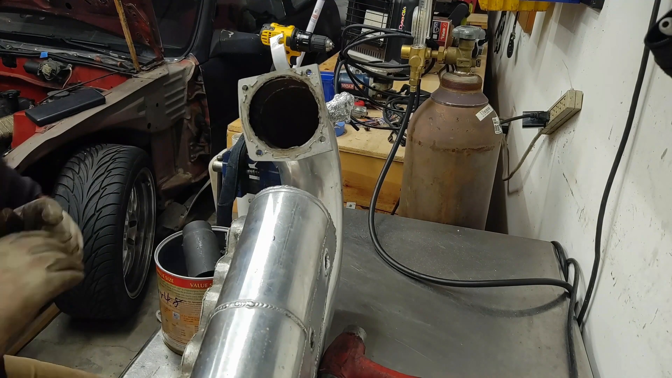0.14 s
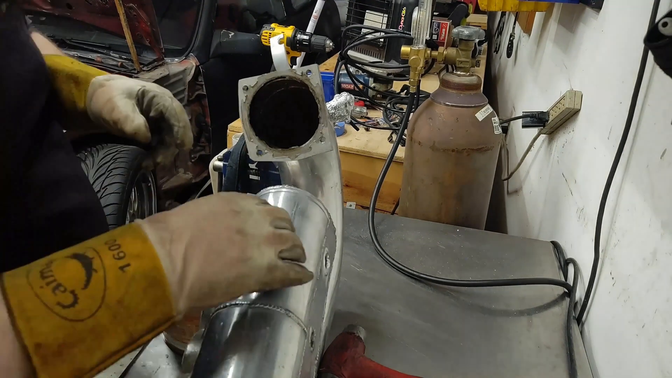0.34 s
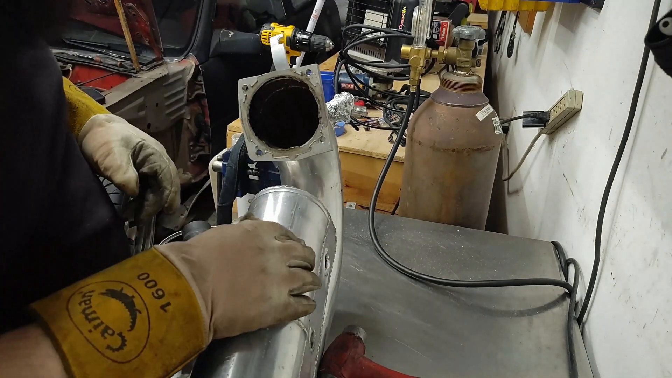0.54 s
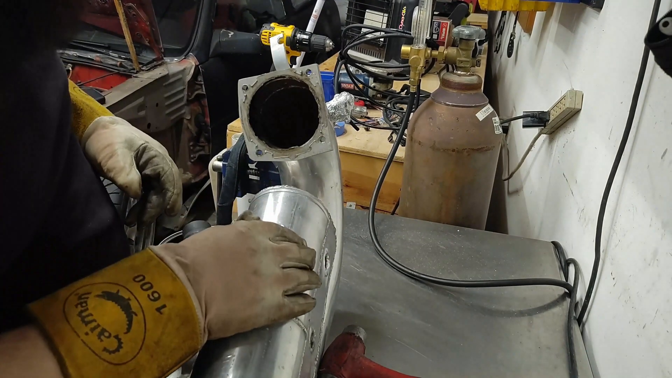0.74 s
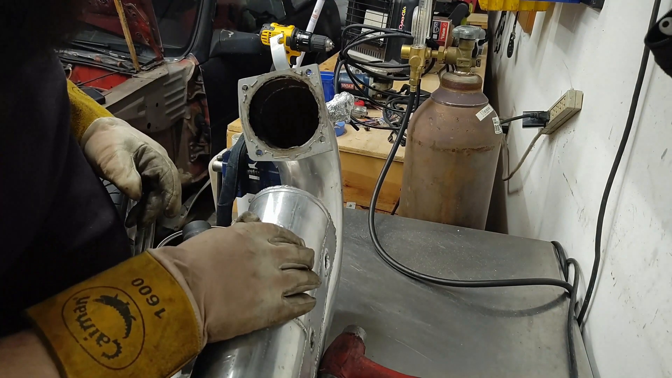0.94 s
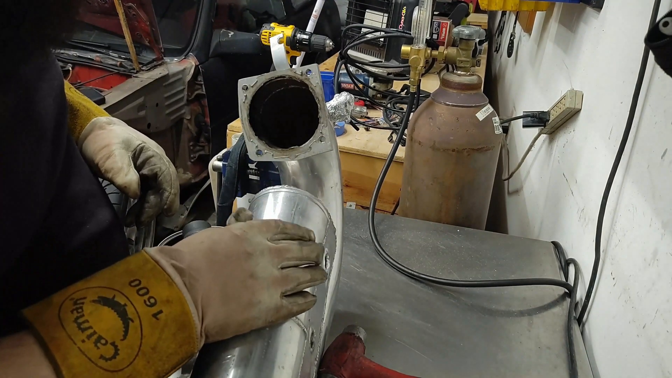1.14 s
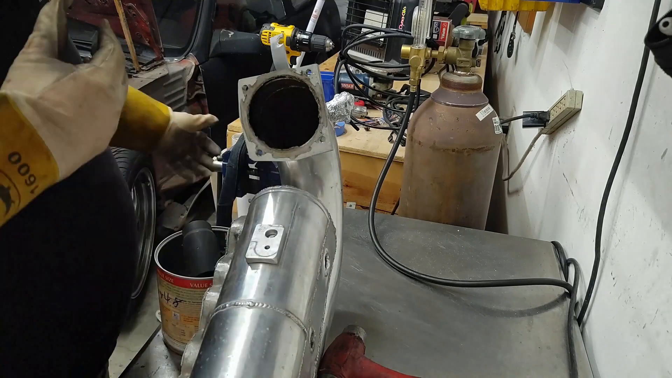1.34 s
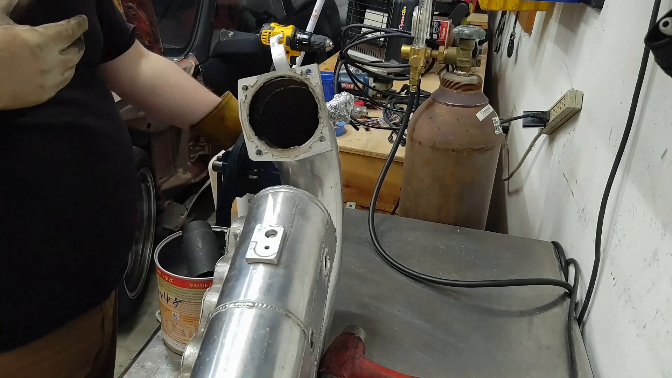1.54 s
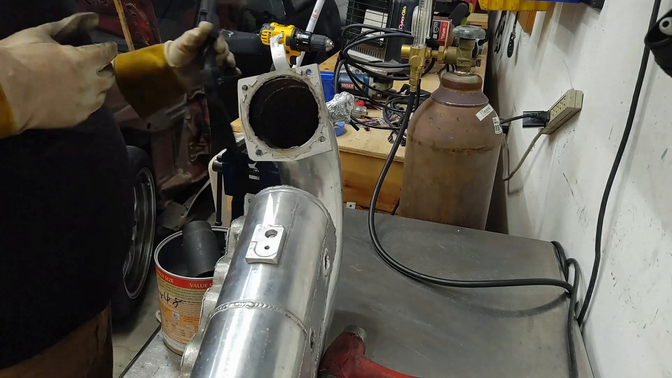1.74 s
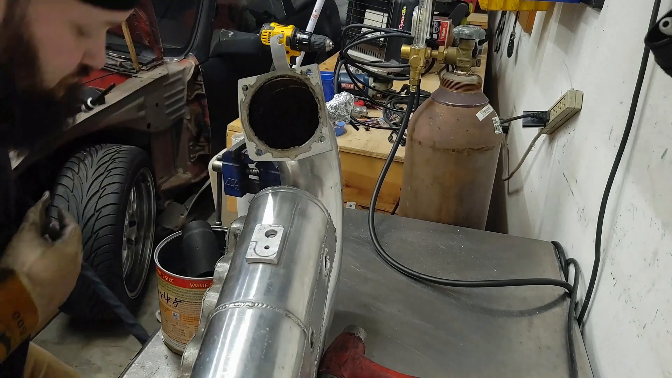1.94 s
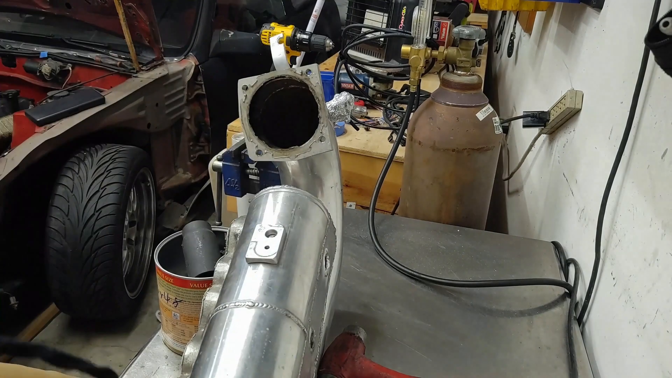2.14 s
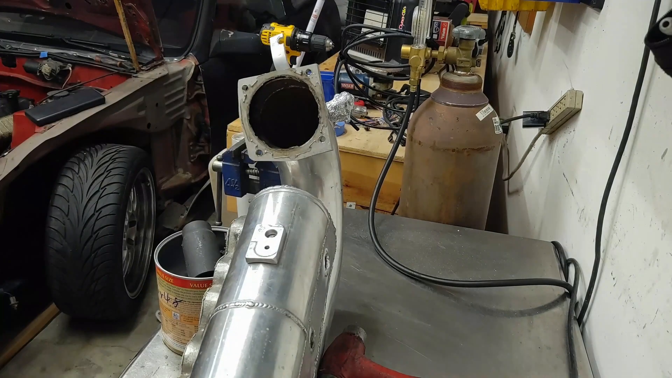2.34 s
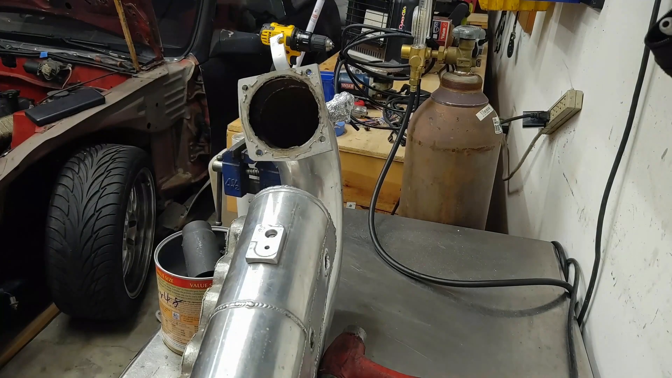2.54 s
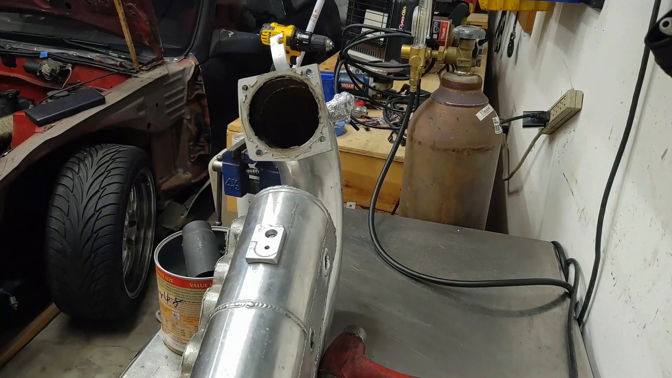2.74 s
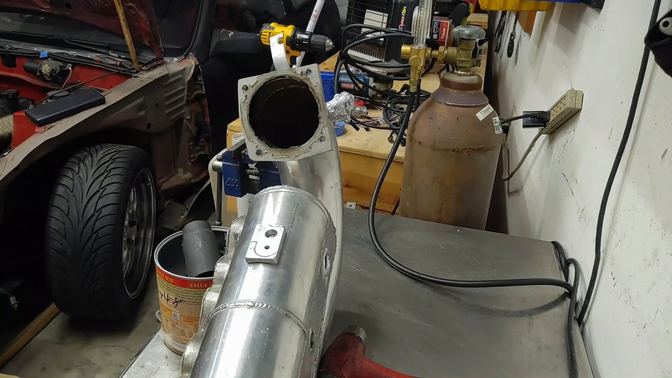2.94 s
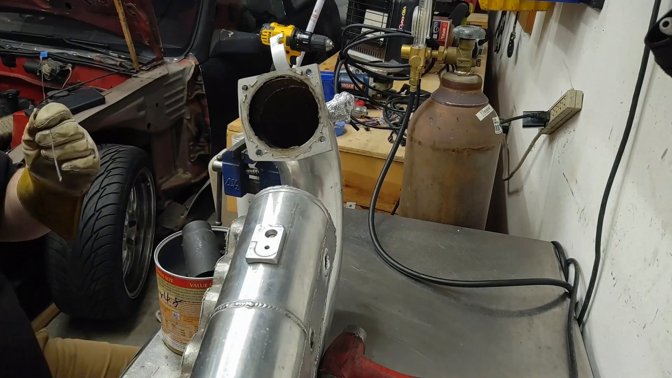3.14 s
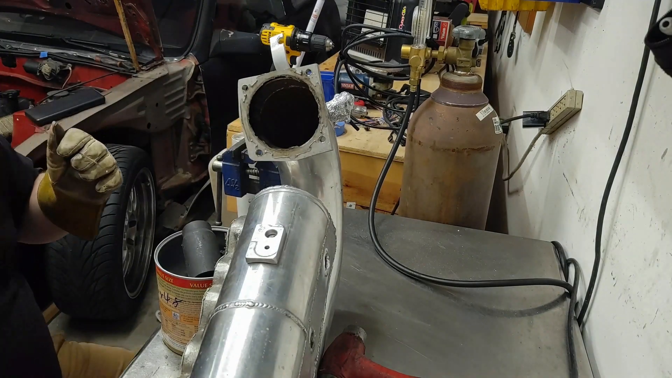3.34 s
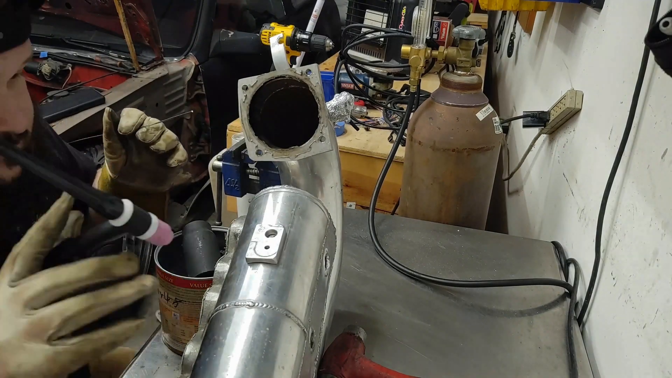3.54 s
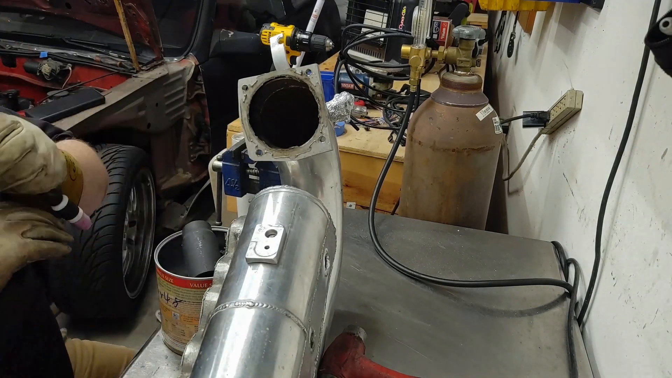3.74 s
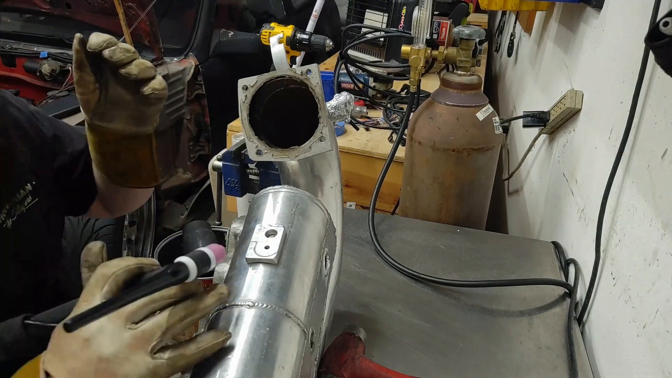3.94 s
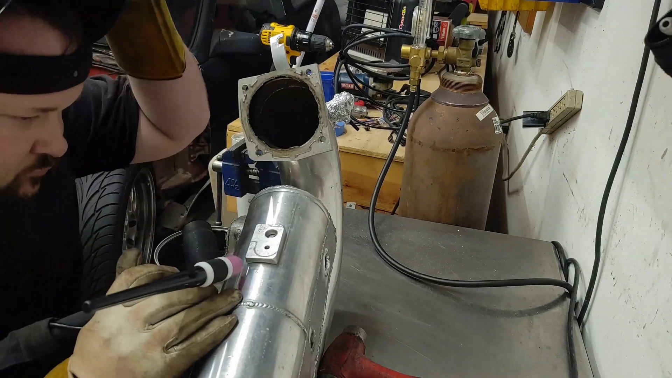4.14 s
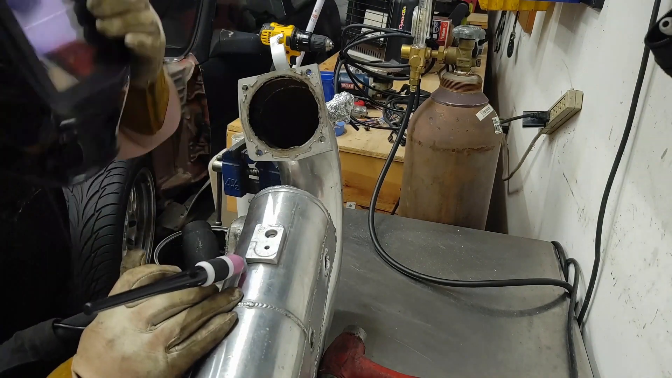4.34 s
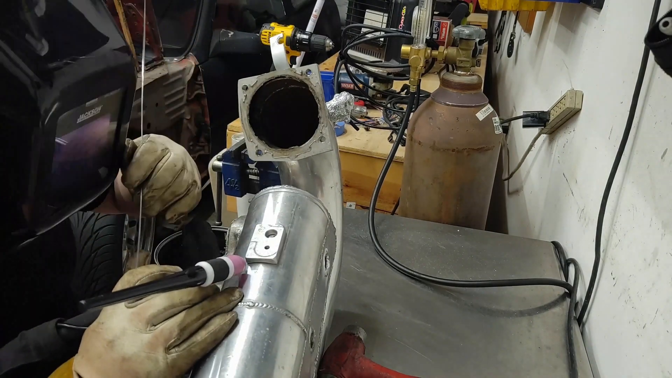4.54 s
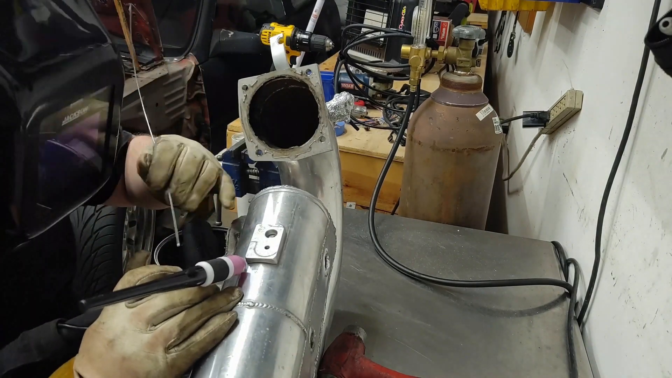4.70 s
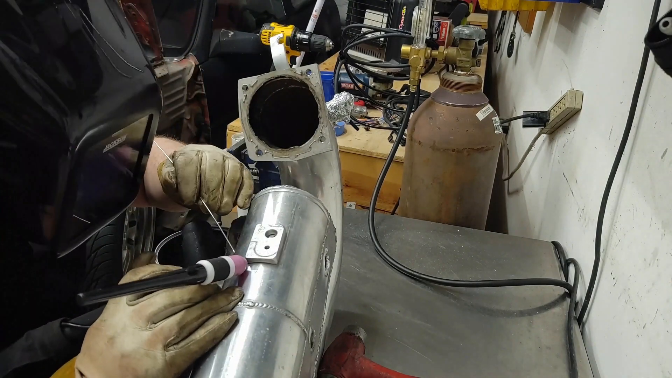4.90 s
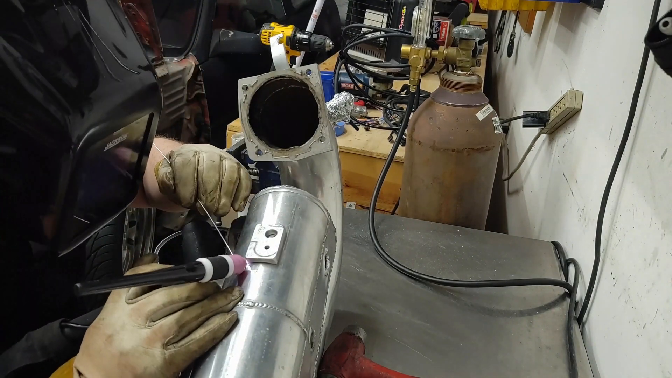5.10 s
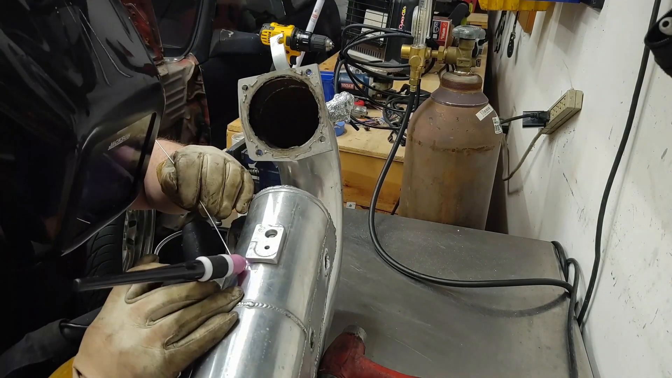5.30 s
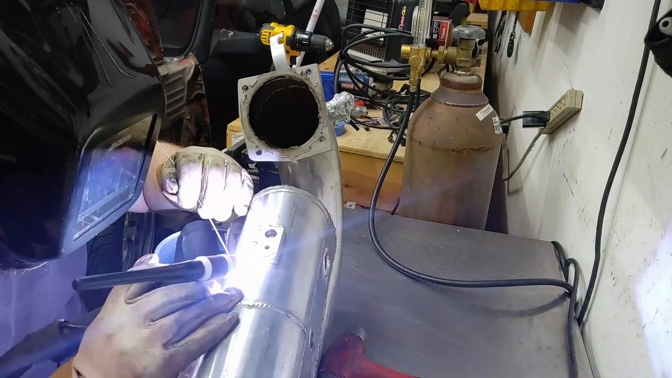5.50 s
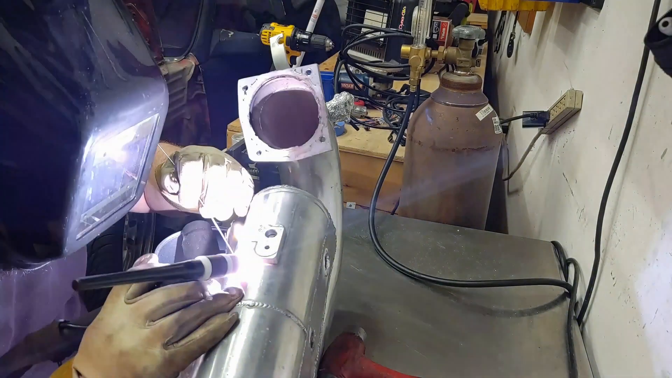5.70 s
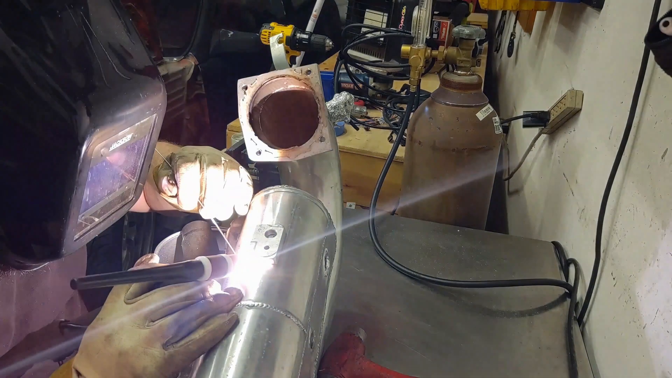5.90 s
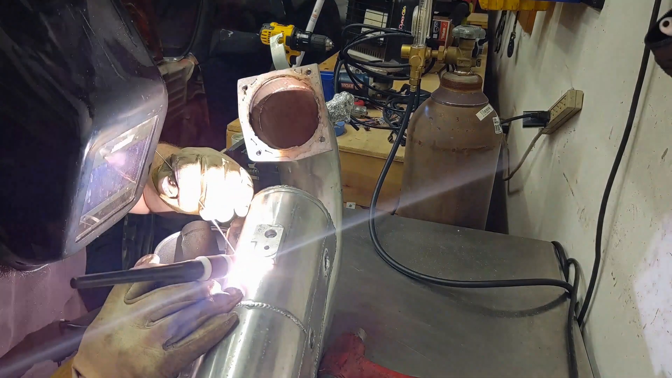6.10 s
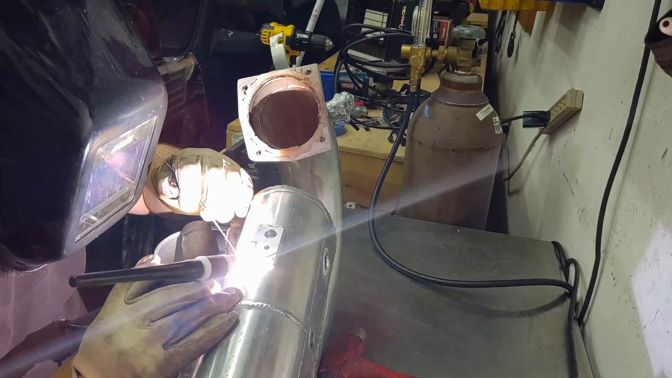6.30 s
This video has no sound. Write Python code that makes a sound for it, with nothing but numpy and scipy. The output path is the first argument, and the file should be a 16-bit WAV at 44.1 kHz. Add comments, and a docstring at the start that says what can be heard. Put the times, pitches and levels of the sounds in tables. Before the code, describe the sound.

A subdued low garage murmur runs underneath, with a barely perceptible very high equipment whine. A faint glove rub comes at 0.15 seconds, a small tick near 0.5, and a sharp, bright click at 0.6. Another light click with a soft thump lands at 1.6, a very faint one at 1.8. A soft rub at 2.1 leads to scuffs and a cluster of glassy rod clinks and clicks from 2.4 to 2.75. At 3.1 a duller double knock comes with a short, stronger scrape; faint rubs follow until 3.9, then quiet. At 5.0 a loud, dense spark hiss starts abruptly, thin then fuller. The arc catches at 5.6, drops out almost completely until 5.67, and returns with soft gas pops. From 5.75 the hiss gives way to a steady, raspy buzz pitched around 147 hertz, with throbbing fizz, slight wavering and occasional spits, continuing to the end at about 6.4. Close, dry stereo.

```python
"""A welder picks up a TIG torch and filler rod in a garage, then lights an arc on an aluminium pipe.
Rubs and scuffs, damped noise-struck clicks and ringing rod modes sound over a murmur of coloured noise.
At 5 s starting sparks hiss as coloured noise for half a second; the AC arc catches and falters with them.
It then settles into a buzz of wavering harmonics, with throbbing noise for fizz, noise spits and
a few soft pops of gas made of short low cycles."""
import sys
import numpy as np
from scipy import signal
from scipy.io import wavfile
from scipy.ndimage import uniform_filter1d

SR = 44100
rng = np.random.default_rng(int(sys.argv[2]) if len(sys.argv) > 2 else 0)


def put_to_file(sound):
    """Save the sound as 16-bit audio at rate SR, in the file named by the first command-line argument."""
    columns = np.atleast_2d(sound).T  # one column per channel
    safe = np.clip(columns, -1, 1)
    whole_steps = np.round(safe * 32767)
    wavfile.write(sys.argv[1], SR, whole_steps.astype(np.int16))


N = 280476
TIME = np.arange(N) / SR

ARC_HZ, EDGE_HZ = 147.39, 15850  # AC frequency; upper edge of the sound
SPARK_ON_S = 5.0015  # press of the pedal
CATCH_S, CATCH_RISE_S = 5.586, 0.0042  # the arc catches and burns weakly
SETTLE_S, SETTLE_RISE_S = 5.742, 0.0031  # the arc settles at full current


def gain_of(db):
    """Decibels to amplitude."""
    return 10 ** (np.asarray(db) / 20)


def evened(x):
    """Scales to an rms of one."""
    return x / np.sqrt(np.mean(x ** 2) + 1e-20)


def stereo_gain(table, hz):
    """Left and right gain of a colour, interpolated over log frequency."""
    table_hz, *sides_db = np.transpose(table)
    return gain_of([np.interp(np.log(hz + 1), np.log(table_hz), side_db) for side_db in sides_db])


def level(table):
    """Gain over time of a level curve, practically silent before its first point."""
    s, db = np.transpose(table)[:2]
    return gain_of(np.interp(TIME, s, db, left=-120))


def add(mix, s, sound):
    """Mixes a sound in at a time."""
    part = mix[..., round(s * SR):][..., :sound.shape[-1]]
    part += sound[..., :part.shape[-1]]


def wander(rate_hz):
    """A smooth random curve of about unit rms."""
    knots = np.convolve(rng.standard_normal(4096), np.hanning(7), "same")
    return np.interp(TIME * rate_hz * 6, np.arange(len(knots)), evened(knots))


def coloured(x, gain_at, size=4096):
    """Passes a sound through a causal minimum-phase filter whose gain is a function of frequency."""
    log_gain = np.log(gain_at(abs(np.fft.fftfreq(size, 1 / SR))) + 1e-6)
    taps = np.fft.ifft(np.exp(np.conj(signal.hilbert(log_gain)))).real
    taps = np.atleast_2d(taps)[:, :size // 2]
    return signal.oaconvolve(np.atleast_2d(x), taps, axes=1)[:, :x.shape[-1]]


def noise(table, likeness, lag_samples):
    """Coloured noise at two ports; the shared part reaches the left one later by the lag."""
    shared, *own = rng.standard_normal((3, N))
    shared_pair = np.array([np.roll(shared, lag_samples), shared])
    pair = np.sqrt(likeness) * shared_pair + np.sqrt(1 - likeness) * np.array(own)
    return coloured(pair, lambda hz: stereo_gain(table, hz))


def bump(hz, centre_hz, q):
    """Gain of one resonance, one at its centre."""
    return 1 / np.hypot(1, q * ((hz + 1) / centre_hz - centre_hz / (hz + 1)))


def burst(contact_s, size=4096):
    """A rattle of contact: noise that builds and dies quickly."""
    u = np.arange(size) / SR / contact_s
    return 2 * rng.standard_normal(size) * u * np.exp(-u ** 2)


def held(start_s, end_s, rise_s, fade_s):
    """An envelope that rises to one by its start, holds, and fades after its end."""
    return np.exp(np.minimum(TIME - start_s, 0) / rise_s - np.maximum(TIME - end_s, 0) / fade_s)


def switched(start_s, rise_s):
    """An envelope that rises to one and stays there."""
    return np.exp(np.minimum(TIME - start_s, 0) / rise_s)


def falter_db():
    """How far the discharge has sunk while the arc nearly goes out."""
    # overlapping drops shared by sparks and arc: (start [s], end [s], further drop [dB])
    falters = [(5.612, 5.671, -7), (5.644, 5.671, -14)]
    edge_s = 0.0019
    return sum(db * held(start_s, end_s, edge_s, edge_s) for start_s, end_s, db in falters)


def arc_strength():
    """The arc catches weakly, falters, then settles and wanders a little with the torch."""
    young_db, settled_db, wander_db = -2.5, -0.5, 0.72
    db = young_db + (settled_db - young_db) * switched(SETTLE_S, SETTLE_RISE_S) + wander_db * wander(11)
    return switched(CATCH_S, CATCH_RISE_S) * gain_of(db + falter_db())


def arc_harmonics(orders, weak_strike=0.83, direct=4):
    """The arc restrikes twice a cycle and reaches the ports directly and by many short paths."""
    # harmonics that pipe and nearby surfaces single out: (multiple, left [dB], right [dB])
    strong = [(1, -63, -54), (5, -47, -52), (7, -39, -52), (8, -51, -49), (9, -58, -38), (10, -48, -53),
              (11, -39, -49), (13, -46, -56), (15, -48, -45), (17, -42, -44), (18, -47, -51),
              (19, -42, -49), (20, -43, -55), (21, -37, -57), (22, -38, -42), (23, -40, -48),
              (24, -33, -39), (25, -42, -52), (26, -37, -54), (30, -47, -46), (32, -45, -49),
              (33, -37, -47), (34, -38, -52), (36, -44, -61), (37, -32.5, -44), (39, -43, -40),
              (43, -44, -44), (45, -35, -56), (58, -54, -40), (74, -61, -38)]
    # the others, before path interference: (frequency [Hz], left [dB], right [dB])
    weak = [(300, -58, -49), (440, -59, -47), (600, -50, -53), (900, -52, -53), (2000, -52, -54),
            (3000, -53, -56), (4200, -51, -57), (5200, -52, -51), (6200, -49, -55), (7200, -48, -51),
            (8500, -52, -47), (10000, -58, -45), (12000, -60, -46), (14000, -57, -49), (15700, -56, -51)]
    direct_edge_hz = 3030  # above this the direct path weakens, so the treble pulses are less spiky
    port_skew = 0.58  # share of the port phase difference that strong harmonics keep
    hz = orders * ARC_HZ
    strikes = 1 + weak_strike * np.exp(-2j * np.pi * orders * .53)  # second strike 0.53 cycle later
    delays_s, signs = rng.gamma(2, .0007, (2, 40, 1)), rng.choice([-1, 1], (2, 40, 1))
    echoes = (signs * np.exp(-2j * np.pi * hz * delays_s)).sum(1)
    paths = direct / (1 + (hz / direct_edge_hz) ** 4) + echoes + .6 * echoes.mean(0)
    # interference between the paths leaves the weak harmonics uneven
    gains = stereo_gain(weak, hz) * evened(abs(paths) ** .5)
    phases = np.angle(strikes * paths)
    for multiple, *sides_db in strong:
        k = np.argmin(abs(orders - multiple))
        gains[:, k] = gain_of(sides_db)
        phases[1, k] = phases[0, k] + port_skew * np.angle(paths[1, k] / paths[0, k])
    return gains * np.exp(1j * phases)


def buzz(strength, drift_rad=0.082):
    """AC arc as a harmonic series; moving torch and restless gas make each harmonic waver and flutter."""
    waver_db, jitter_s = 1.3, 1.2e-6  # rms of each harmonic's level and of the strike timing
    flutter = 0.22  # quick unrest as a share of each harmonic
    surge_db, surge_fade_s = 1.5, 0.079  # the low harmonics surge as the arc settles
    low_hold = 0.27  # share of the falter that the low harmonics are spared
    orders = np.arange(1, int(EDGE_HZ / ARC_HZ) + 1)
    lit = TIME > CATCH_S - 10 * CATCH_RISE_S
    t = (TIME + jitter_s * wander(90))[lit]
    surge = held(SETTLE_S, SETTLE_S, SETTLE_RISE_S, surge_fade_s)
    low_db = (surge_db * surge - low_hold * falter_db())[lit]

    slow = rng.standard_normal((len(orders), 2, 100))
    slow = evened(uniform_filter1d(uniform_filter1d(slow, size=12), size=12))
    quick = evened(uniform_filter1d(rng.standard_normal(slow.shape), size=2))
    drift = drift_rad * np.sqrt(orders * ARC_HZ / 1000)[:, None]  # phase drift, full size at 1 kHz
    unrest = gain_of(waver_db * slow[:, 0]) * np.exp(1j * drift * slow[:, 1])
    unrest = unrest + flutter * (quick[:, 0] + 1j * quick[:, 1])

    grid, out = np.linspace(t[0], t[-1], slow.shape[-1]), np.zeros((2, N))
    for hz, line, waver in zip(orders * ARC_HZ, arc_harmonics(orders).T, unrest):
        low_gain = gain_of(low_db / (1 + (hz / 2100) ** 4))
        tone = low_gain * np.interp(t, grid, waver) * np.exp(2j * np.pi * hz * t)
        out[:, -len(t):] += np.sqrt(2) * (line[:, None] * tone).real
    return out * strength


def hum():
    """A sine at the lowest harmonic of the arc swells and fades, mostly at the right port."""
    # swell before the port offsets: (time [s], level [dB])
    swell = [(5.8, -52), (5.814, -44), (5.9, -53), (5.922, -44), (5.998, -45.5), (6.03, -62), (6.12, -39.5),
             (6.212, -59), (6.35, -52)]
    # port offsets: (left [dB], right [dB])
    ports_db = [-13, 4.5]
    tone = np.sqrt(2) * np.sin(2 * np.pi * ARC_HZ * TIME)
    return gain_of(ports_db)[:, None] * tone * level(swell)


def fizz(strength, depth=0.37):
    """Hot gas fizzes as noise throbbing at twice the AC rate; the weld pool spits in noise bursts."""
    # fizz colour before its level: (frequency [Hz], left [dB], right [dB])
    colour = [(30, -58, -49), (90, -45, -36), (250, -35, -31), (700, -33, -35), (1400, -33, -35),
              (2100, -34, -36), (3400, -28.5, -34), (4300, -32, -36), (5500, -28, -33), (7500, -33, -34),
              (9000, -36, -30), (11000, -40, -29), (13500, -37, -29.5), (15500, -31.5, -28.5)]
    # spits: (time [s], level [dB])
    spits = [(5.587, -28), (5.601, -28), (5.701, -26), (5.759, -29), (6.095, -32), (6.3, -33)]
    fizz_db, flicker_db = 0.4, 1.1
    throb = evened(1 + depth * np.cos(4 * np.pi * ARC_HZ * TIME))
    flicker = gain_of(fizz_db + flicker_db * wander(25))
    out = noise(colour, likeness=0.48, lag_samples=-2) * throb * strength * flicker
    for s, db in spits:
        add(out, s, gain_of(db) * np.array([burst(0.00099), burst(0.00087)]))
    return out


def pops():
    """Soft pushes of shielding gas, a cycle or two long; the deep ones buffet the right port."""
    # (time [s], right level [dB], pitch [Hz], left relative to right [dB])
    pushes = [(5.587, -36, 110, -24), (5.601, -27, 151, -23), (5.681, -27.5, 670, 5.5),
              (5.688, -27, 1080, 10), (5.7, -30.5, 656, 8), (5.822, -33, 128, -14),
              (6.246, -35.5, 165, -20), (6.303, -30.5, 110, -24)]
    out = np.zeros((2, N))
    for s, db, hz, left_db in pushes:
        cycles = (TIME - s) * hz
        push = np.cos(2 * np.pi * cycles) * np.exp(-(cycles / 0.71) ** 2)
        out -= gain_of([[db + left_db], [db]]) * push
    return out


def spark_strength():
    """The sparks switch on, sag slowly, yield once the arc carries current, and stop."""
    off_s, rise_s, fade_s = 5.762, 0.0016, 0.0089
    start_db, sag_db_per_s, yield_db = 0.17, -2, -3.5
    db = start_db + sag_db_per_s * (TIME - SPARK_ON_S) + yield_db * switched(CATCH_S, CATCH_RISE_S)
    return held(SPARK_ON_S, off_s, rise_s, fade_s) * gain_of(db + falter_db())


def sparks():
    """Starting sparks come so densely that they merge into a hiss, modelled as resonant noise."""
    # hiss colour before cup and strength: (frequency [Hz], left [dB], right [dB])
    colour = [(30, -53, -45), (132, -32, -26), (450, -34, -26.5), (900, -30, -26.5), (1380, -32, -22),
              (2280, -31, -22.5), (3460, -25.5, -19), (4700, -24.5, -19.5), (5950, -21, -25.5),
              (7200, -26, -32.5), (9000, -27.5, -25), (11300, -28.5, -20), (12900, -31.5, -20),
              (15100, -24, -25)]
    # resonances of torch cup and pipe: (frequency [Hz], Q, added gain [dB])
    cup = [(1290, 2.5, -3), (5340, 24, -1.5), (5970, 18, -2), (12840, 27, 2), (14650, 39, -9)]
    warmup_s, thin_db = 0.072, -7  # the first sparks are thin: their body grows in
    hiss = noise(colour, likeness=0.35, lag_samples=-5) * spark_strength() * gain_of(.5 * wander(60))
    hiss = coloured(hiss, lambda hz: 1 + sum(gain_of(db) * bump(hz, centre_hz, q) ** 2
                                             for centre_hz, q, db in cup))
    body = signal.sosfiltfilt(signal.butter(3, 7000, fs=SR, output="sos"), hiss)
    growth = gain_of(np.interp(TIME - SPARK_ON_S, [0, warmup_s], [thin_db, 0]))
    return hiss + (growth - 1) * body


def clicks():
    """Torch and tools click: a contact burst excites a short ring, a broad crack and a thump."""
    # (time [s], ring [dB], ring [Hz], crack [dB], crack centre [Hz], thump [dB], contact [s])
    contacts = [(0.488, -28.5, 3140, -55, 2300, -70, 0.0085), (0.582, -9.5, 7520, -20.5, 4100, -54, 0.0039),
                (1.6223, -20.5, 9550, -42.5, 11000, -30, 0.0026), (1.805, -47, 9500, -58, 11000, -70, .005),
                (2.629, -15, 11300, -26.5, 6530, -43, 0.0018),
                (2.657, -20, 13600, -33.5, 7000, -41, 0.0058),
                (2.7364, -16.5, 11900, -28.5, 11900, -49, 0.0037),
                (3.112, -20, 1855, -42, 1700, -47, 0.0045), (3.122, -29, 1040, -43, 2220, -44, 0.0054),
                (3.153, -35, 1770, -61, 800, -37, 0.0034), (3.859, -49, 1130, -53, 1210, -44, 0.0036)]
    mix = np.zeros((1, N))
    for s, ring_db, ring_hz, crack_db, crack_hz, thump_db, contact_s in contacts:
        def body(hz):
            """Gain of the struck body."""
            ring = gain_of(ring_db) * bump(hz, ring_hz, 46)
            crack = gain_of(crack_db) * bump(hz, crack_hz, 0.76) ** 2
            thump = gain_of(thump_db) * bump(hz, 275, 1.2) ** 2
            return ring + crack + thump
        add(mix, s, coloured(burst(contact_s), body))
    return mix


def rod_clinks():
    """The filler rod slides and clinks: tiny slips feed each decaying mode as long as it slides."""
    # (time [s], level [dB], most excited [Hz], Q of excitation, sliding [s])
    slides = [(2.245, -50.5, 7660, 18, 0.036), (2.487, -45, 11100, 2.5, 0.0047),
              (2.536, -42.5, 9000, 0.92, 0.012), (2.603, -43.5, 10000, 1.4, 0.043),
              (2.628, -31.5, 8000, 2.3, .015), (2.638, -27.5, 10000, 6.3, 0.0087),
              (2.657, -27, 8200, 8.5, .003), (2.66, -42, 4500, .8, 0.0069)]
    # modes of the rod: (frequency [Hz], level [dB], t60 [s])
    modes = [(3530, -6, .12), (5470, -15, .07), (7670, -4, .07), (7990, -6, .1), (8360, 0, .15),
             (9870, -3, .05), (10300, -2, .05), (11200, -3, .06), (11600, -3, .05), (13860, -6, .1)]
    mix, t = np.zeros((1, N)), np.arange(SR // 5) / SR
    for s, db, excited_hz, q, slide_s in slides:
        for hz, mode_db, t60_s in modes:
            slips = rng.standard_normal(len(t)) * (t <= slide_s)
            free = gain_of(-60 * t / t60_s) * np.sin(2 * np.pi * hz * t)
            ring = evened(signal.fftconvolve(slips, free)[:len(t)]) * np.std(free)
            add(mix, s, gain_of(db + mode_db) * bump(hz, excited_hz, q) * ring)
    return mix


def short_tail(x, near_db, near_s, far_db, far_t60_s):
    """A short dense tail that stops soon, then a faint longer one, as decaying noise echoes."""
    t = np.arange(SR // 3) / SR
    near, far = rng.standard_normal((2, 2, len(t))) * (t > .002)
    near = near / (1 + (t / near_s) ** 12) * np.exp(-t / near_s)
    far = far * gain_of(-60 * t / far_t60_s)
    echoes = gain_of(near_db) * near / np.linalg.norm(near[0]) + gain_of(far_db) * far / np.linalg.norm(far[0])
    return x + signal.oaconvolve(x, echoes, axes=1)[:, :N]


def handling():
    """Clicks and clinks radiate little bass, take each port's colour and get a short dense tail."""
    # colour of each microphone port: (frequency [Hz], left [dB], right [dB])
    port_colour = [(99, 20.5, 19.5), (4360, -5, -8.5), (5940, 0.5, -3), (7700, -12.5, -6.5),
                   (9700, -11, -3.5), (12100, -17, 1), (16100, -3, -10)]
    highpass = signal.butter(3, 150, "high", fs=SR, output="sos")
    mix = signal.sosfilt(highpass, clicks() + rod_clinks())
    ports = coloured(mix, lambda hz: stereo_gain(port_colour, hz))
    return short_tail(ports, near_db=-3.5, near_s=0.03, far_db=-33, far_t60_s=0.16)


def rubbing():
    """Grainy friction of gloves and cable: coloured noise, stroke by stroke."""
    # friction colour before stroke level: (frequency [Hz], left [dB], right [dB])
    colour = [(80, -45, -47), (297, -34, -42), (650, -42, -38), (980, -35, -37), (1390, -58, -52),
              (2020, -34.5, -41.5), (2930, -46.5, -45), (4900, -51.9, -61), (6900, -43, -43.5),
              (8460, -52, -43.5), (10200, -48, -36), (12300, -55, -38.5), (15500, -49, -45)]
    # (start [s], hold [s], level [dB], rise and fade [s])
    rubs = [(.15, .12, -30, .03), (2.078, .12, -25.5, .08), (2.431, .008, -14, .012), (2.6, 0.1, -15, .08),
            (3.109, 0.092, -16, .045), (3.114, .018, -1, 0.0022), (3.138, 0.035, -6.5, .003),
            (3.605, .01, -25, .015), (3.74, .08, -31, .03)]
    strokes = sum(gain_of(db) * held(s, s + hold_s, edge_s, edge_s) for s, hold_s, db, edge_s in rubs)
    grain = gain_of(2.0 * wander(100))
    return noise(colour, likeness=0.19, lag_samples=8) * strokes * grain


def shop():
    """Low murmur of the garage as coloured noise, and the faint whine of the welding set as a sine."""
    # murmur colour: (frequency [Hz], left [dB], right [dB])
    colour = [(25, -58, -62), (60, -67, -60), (110, -51, -48.5), (149, -54.5, -53.5), (225, -34, -33),
              (361, -41.5, -42), (480, -50, -50.5), (650, -43, -49.5), (1084, -52.5, -53),
              (1870, -55.5, -57), (4200, -63, -66), (6700, -66, -69), (10300, -87, -67),
              (14900, -74.5, -77)]
    # whine level: (left [dB], right [dB])
    whine_hz, whine_db, swell_db = 15294, [-90.5, -78], .6
    murmur = noise(colour, likeness=0.5, lag_samples=10) * gain_of(swell_db * wander(6))
    phase = 2 * np.pi * np.cumsum(whine_hz + 12 * wander(30)) / SR
    whine = np.sqrt(2) * np.sin(phase) * gain_of(1.4 * wander(12))
    return murmur + gain_of(whine_db)[:, None] * whine


def scene():
    """Everything at the two ports."""
    strength = arc_strength()
    arc = buzz(strength) + hum() + fizz(strength) + pops() + sparks()
    return arc + handling() + rubbing() + shop()


def record(dry):
    """A steep cut of the highest treble."""
    lowpass = signal.firwin(511, EDGE_HZ, window=("kaiser", 9), fs=SR)
    return signal.oaconvolve(dry, lowpass[None], "same")


dry = scene()
out = record(dry)
put_to_file(out)
```